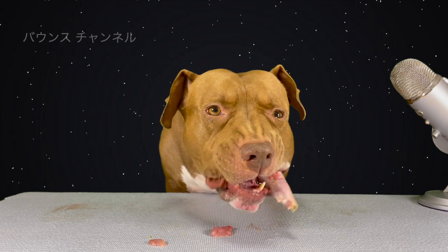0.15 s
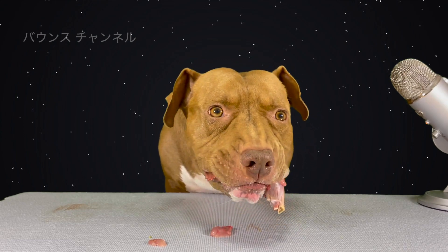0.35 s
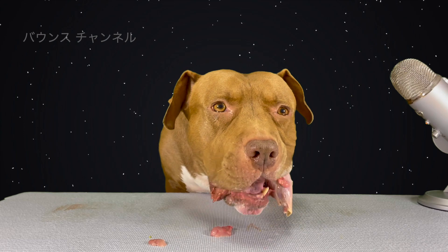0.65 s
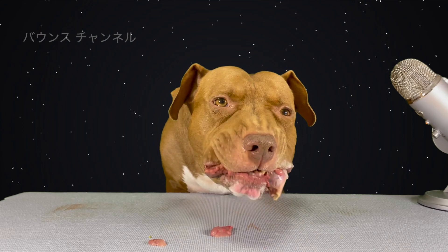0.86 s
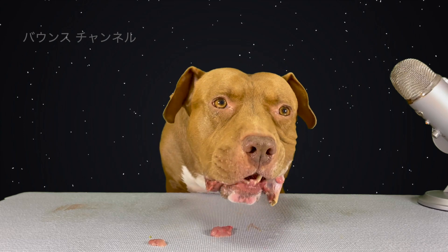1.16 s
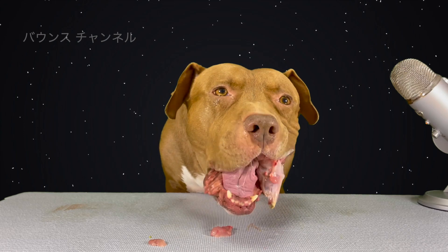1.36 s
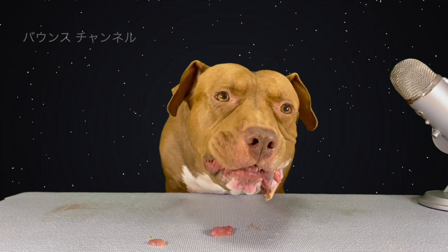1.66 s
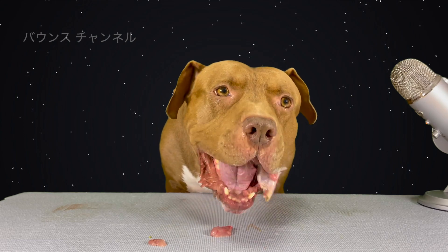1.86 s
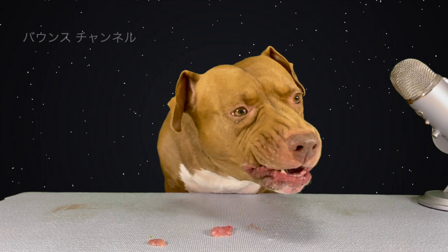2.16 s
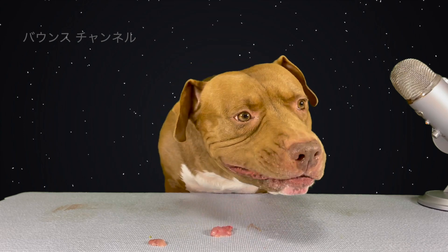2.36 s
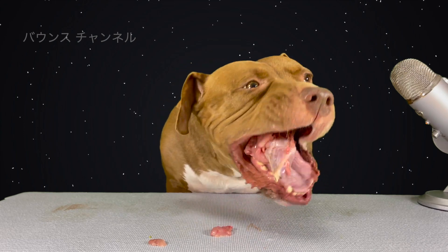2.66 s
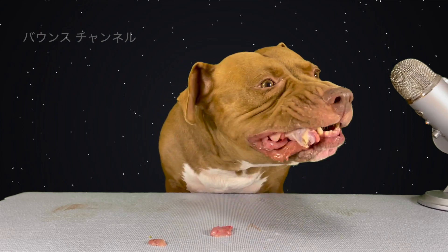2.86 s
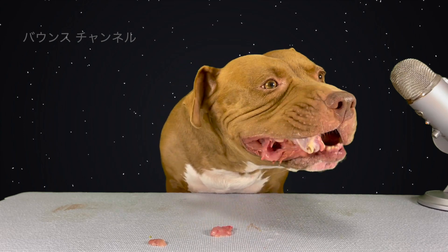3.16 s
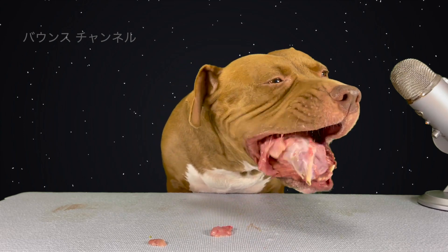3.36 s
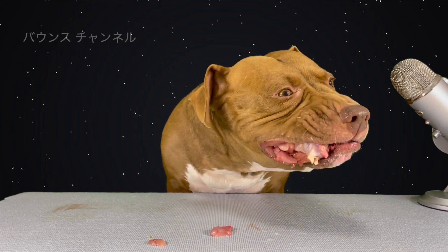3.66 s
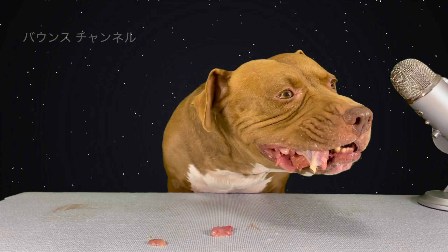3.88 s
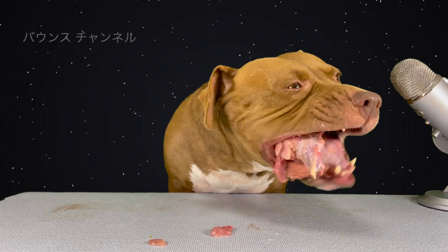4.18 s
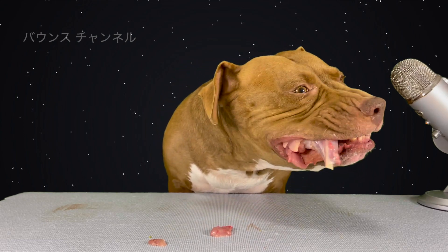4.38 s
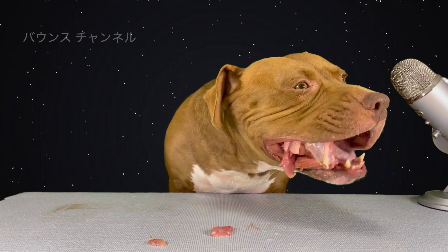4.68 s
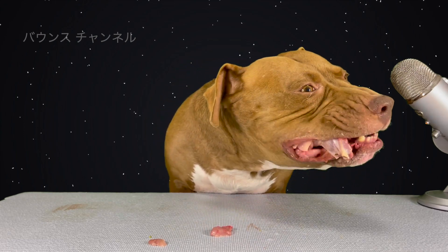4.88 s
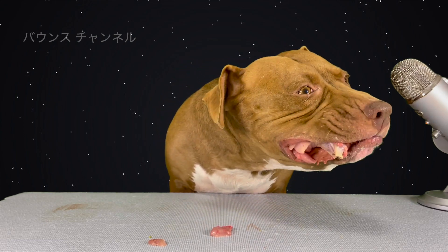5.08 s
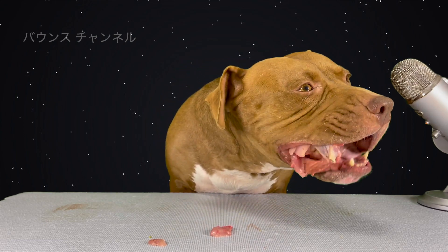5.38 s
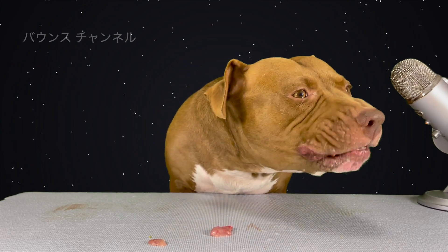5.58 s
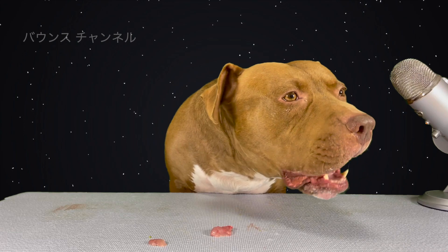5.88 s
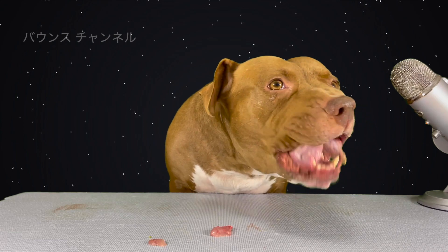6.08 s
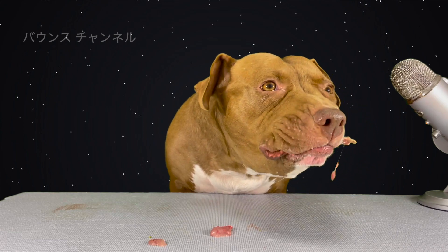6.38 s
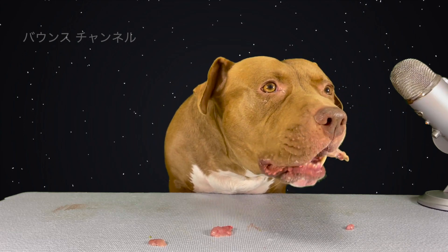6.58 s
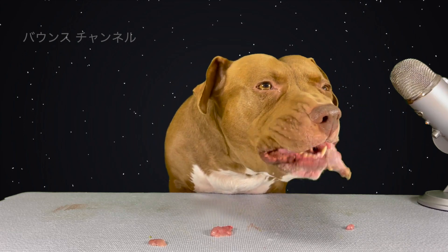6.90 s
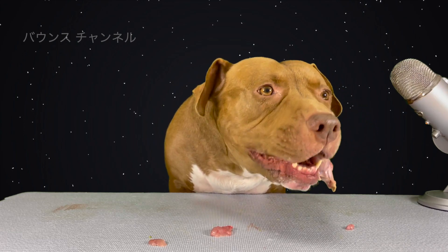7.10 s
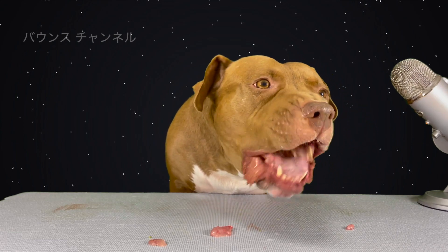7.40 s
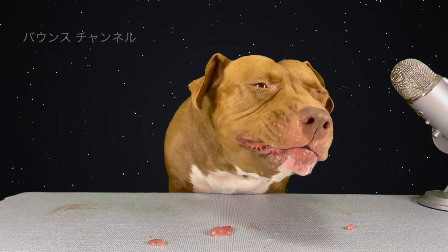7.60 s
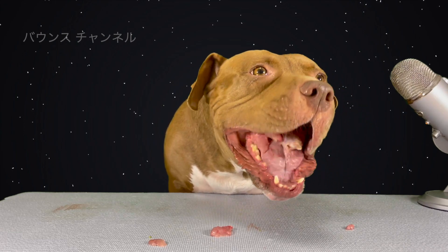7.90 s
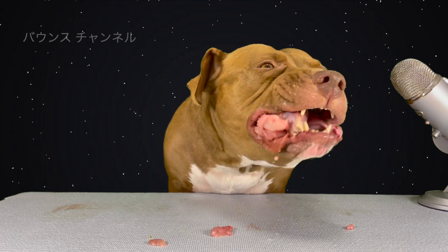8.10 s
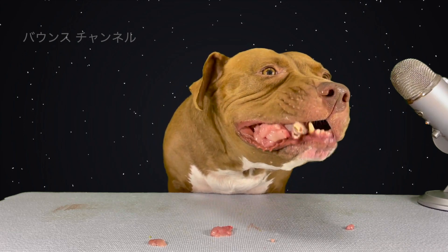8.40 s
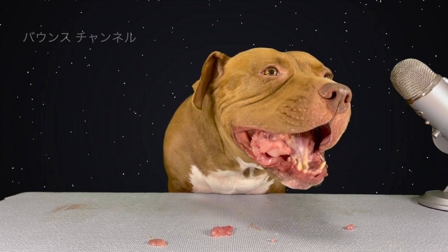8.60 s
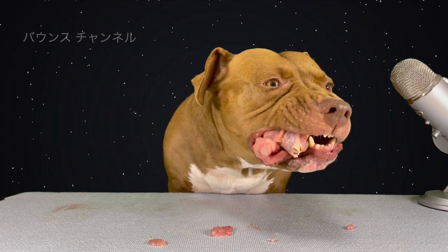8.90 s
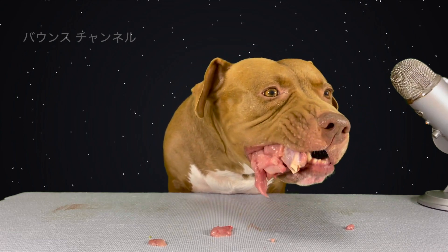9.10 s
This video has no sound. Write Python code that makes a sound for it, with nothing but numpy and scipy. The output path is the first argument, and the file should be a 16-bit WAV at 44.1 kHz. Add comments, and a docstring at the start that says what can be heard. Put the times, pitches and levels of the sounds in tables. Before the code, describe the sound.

Close mono pickup of wet canine chewing in a small reflective room. Irregular low-pitched lip pops lead, followed by quiet squishing and a lull, then hard bone snaps with crackling gristle and brief slurps. Clusters of crunches and hollow smacks peak past the middle, ease off, and return in bursts near eight and nine seconds. Fizzing saliva, faint gurgles, soft hiss and low rumble fill the gaps.

```python
"""A dog chews raw meat and bone: mouth air pockets pop, bone cracks and saliva ticks, each a decaying ring
with a snap of noise. Between these come sucking, crackling crushes, squelch and fizz, in which
random slips and bubbles excite resonances of mouth, flesh and froth. A small, hard-walled room adds
decaying echoes; behind lie a faint hiss, a low rumble and gurgles. A single microphone feeds both channels."""
import sys
import numpy as np
from scipy import signal
from scipy.fft import rfft, irfft
from scipy.io import wavfile
from scipy.ndimage import uniform_filter1d

SR = 44100
rng = np.random.default_rng(int(sys.argv[2]) if len(sys.argv) > 2 else 0)


def store_wav(level_fs):
    """Save 16-bit WAV to argv[1]."""
    pcm = np.round(np.clip(np.atleast_2d(level_fs), -1, 1) * 32767)
    wavfile.write(sys.argv[1], SR, pcm.T.astype(np.int16))


N = 407925  # samples

# Air pockets bursting in the mouth: t/s of the peak, ring peak level/dB, cavity f/Hz
POPS = [(0.273, -17.5, 780), (0.2805, -4.5, 713), (0.4485, -19.5, 780), (0.535, -13, 950),
        (0.5415, -10.5, 725), (0.8973, -11.5, 604), (0.9147, -11, 630), (0.9469, -11.5, 1350),
        (1.145, -26.5, 790), (1.2899, -23.5, 1180), (1.5277, -22, 1370), (1.6155, -21, 925),
        (1.844, -17, 906), (1.9537, -21, 900), (2.1007, -19, 527), (2.261, -18, 600), (3.1106, -8.5, 1116),
        (3.458, -23, 573), (3.49, -18.5, 900), (4.21, -24, 210), (4.2661, -18.5, 1300), (4.366, -24, 1170),
        (5.7428, -14, 563), (5.757, -13, 453), (6.0844, -8.5, 567), (6.1977, -6.5, 1450),
        (6.2298, -11, 1270), (6.3451, -6, 1130), (6.8868, -14, 454), (6.9849, -10.5, 1490),
        (7.0262, -15, 490), (7.4374, -17.5, 407), (7.5918, -10.5, 410), (7.674, -23, 650),
        (8.402, -18.5, 655), (8.9934, -18.5, 296), (9.0752, -24, 614)]
# Bone and gristle breaking: t/s of the peak, ring peak level/dB, ring f/Hz
CRACKS = [(0.7697, -19.5, 4820), (0.8961, -12, 1370), (0.914, -12, 2460), (1.131, -29, 1560),
          (1.196, -25, 3230), (1.289, -21.5, 3580), (1.319, -33, 5340), (1.5272, -23.5, 2370),
          (1.61, -19.5, 4040), (1.7066, -24, 3670), (1.725, -16.5, 3580), (1.753, -16, 3930),
          (2.1247, -14.5, 1560), (2.6298, -15, 4850), (2.7949, -8, 2000), (3.0995, -17, 2880),
          (3.1551, -18, 2080), (3.249, -8, 2400), (3.3754, -20, 2670), (3.386, -25, 2440),
          (3.469, -18.5, 1570), (3.5669, -18.5, 1970), (3.6779, -6.5, 2510), (4.2036, -9, 3650),
          (4.417, -35, 3700), (4.5537, -24.5, 1670), (4.8389, -18.5, 2380), (4.9018, -1, 2920),
          (4.9655, -14, 1700), (5.0015, -8.5, 1660), (5.08, -23, 2820), (5.0887, -8, 2820),
          (5.4356, -4.5, 2570), (5.4552, -9, 3050), (5.5305, -19, 2700), (5.7949, -18.5, 1740),
          (5.8494, -19.5, 3420), (5.918, -25, 2300), (5.9311, -2.5, 2300), (6.0276, -20, 1980),
          (6.041, -14.5, 1910), (6.0682, -9, 2760), (6.0776, -7.5, 1680), (6.1034, -14, 2740),
          (6.1516, -13, 1640), (6.3058, -6, 2120), (6.4559, -15.5, 2370), (6.6306, -18.5, 2660),
          (6.6634, -16.5, 2070), (6.8857, -5.5, 1680), (6.9709, -8.5, 1520), (7.2249, -28, 2040),
          (7.3918, -18, 2000), (7.4307, -12.5, 1980), (7.626, -25.5, 2660), (7.947, -25.5, 2250),
          (8.038, -21.5, 2050), (8.1168, -17.5, 4100), (8.1356, -10.5, 2180), (8.147, -5, 1880),
          (8.393, -30, 2960), (8.546, -28, 2270), (8.8598, -2.5, 2340), (9.1995, -22.5, 4250),
          (9.2213, -21, 3620)]
# Strands of saliva snapping: t/s of the peak, ring peak level/dB, centre f/Hz
TICKS = [(0.46, -29, 2150), (0.7147, -21.5, 8460), (0.8136, -22, 7780), (1.454, -21.5, 6260),
         (1.4802, -19, 6900), (1.628, -16.5, 5750), (1.726, -18.5, 7910), (2.2297, -24.5, 10650),
         (3.3752, -21.5, 6770), (3.6783, -10, 10880), (4.192, -18.5, 2200), (4.2677, -13.5, 6860),
         (4.9797, -9.5, 10530), (5.887, -27, 11800), (6.0683, -12, 9000), (6.1328, -16.5, 7700),
         (6.272, -25, 8200), (6.3037, -14.5, 6500), (6.345, -11.5, 8510), (6.431, -34, 7200),
         (6.4574, -20, 7270), (6.8378, -22.5, 9430), (6.9002, -18, 9680), (8.365, -30, 7260),
         (8.3769, -23.5, 7100)]
# Drawn-out sucking through a narrow pocket: start t/s, length t/s, level/dB before fading, first f/Hz, last f/Hz
SUCKS = [(0.0, 0.01, -19.5, 1870, 1620), (0.056, 0.061, -41, 1880, 1690), (0.788, 0.12, -36, 252, 170),
         (2.808, 0.081, -34, 240, 163), (3.091, 0.11, -25.5, 1040, 1260), (3.615, 0.092, -28.5, 1110, 1040),
         (3.915, 0.13, -37, 1310, 1370), (4.262, 0.1, -37, 1320, 1340), (4.89, 0.097, -26.5, 1680, 1630),
         (4.893, 0.086, -24, 3030, 2900), (5.009, 0.065, -21, 1350, 1310), (5.406, 0.039, -24, 1040, 1050),
         (5.44, 0.081, -25, 2670, 2470), (5.924, 0.04, -21.5, 1230, 1200), (6.18, 0.24, -29, 1350, 1160),
         (6.451, 0.058, -30, 1000, 1010), (6.845, 0.07, -33, 280, 292), (6.962, 0.1, -23, 1390, 1350),
         (7.113, 0.087, -40, 330, 260), (8.128, 0.09, -23.5, 1940, 1640), (8.125, 0.06, -20, 6100, 4800),
         (8.19, 0.17, -28, 1060, 1270), (8.393, 0.057, -26, 1430, 1360), (8.843, 0.055, -22, 3780, 3640),
         (8.854, 0.048, -30, 2040, 1850), (8.948, 0.066, -31.5, 220, 190)]
# Teeth grinding through tissue: start t/s, length t/s, level/dB before shaping, centre f/Hz
CRUSHES = [(0, 0.046, -31, 1940), (0.105, 0.15, -31, 940), (0.164, 0.048, -34.5, 3040),
           (0.62, 0.24, -41.5, 5800), (0.882, 0.049, -25.5, 3600), (1.183, 0.076, -42.5, 4650),
           (1.388, 0.19, -40, 5940), (1.838, 0.055, -37, 3820), (2.038, 0.11, -32, 5360),
           (2.215, 0.02, -34, 4800), (2.689, 0.07, -33, 7300), (2.698, 0.33, -40, 1870),
           (3.252, 0.069, -39.5, 3260), (3.362, 0.16, -38.5, 4240), (3.55, 0.078, -34, 6900),
           (3.611, 0.06, -23.5, 7800), (4.748, 0.079, -33.5, 5370), (4.884, 0.031, -22.5, 3430),
           (4.905, 0.091, -26, 2270), (4.983, 0.088, -23.5, 3800), (5.495, 0.04, -32, 480),
           (5.238, 0.043, -39.5, 5420), (5.4, 0.18, -33.5, 2830), (6.007, 0.076, -36.5, 10200),
           (6.062, 0.22, -31.5, 4900), (6.325, 0.016, -22.5, 1980), (6.45, 0.015, -23.5, 6850),
           (6.599, 0.17, -38.5, 6760), (6.808, 0.26, -31.5, 2850), (7.213, 0.052, -32, 3450),
           (7.351, 0.21, -37, 1980), (8.001, 0.076, -36.5, 7300), (8.109, 0.16, -30.5, 3870),
           (8.396, 0.051, -40, 1800), (8.776, 0.012, -31.5, 3600), (9.215, 0.021, -36.5, 3400)]
# Bubble loudness by pitch: f/Hz, relative level/dB
FIZZ_SPECTRUM = [(2500, 8), (4000, 0), (7000, 12), (11000, 11), (15000, 2)]
# Reverberation time of the room: f/Hz, t60 t/s
ROOM_T60 = [(400, 0.37), (6000, 0.31)]
# Low rumble over time: t/s, level/dB
RUMBLE = [(0.0, -51), (4.53, -52), (6.36, -49), (8.22, -43.5), (9.25, -55)]
# Spectrum of the steady hiss: f/Hz, relative level/dB
HISS_SPECTRUM = [(40, -6), (300, 0), (2000, -6), (15500, -12)]

RING_SAMPLES = 1200  # length of one short ring
SNAP_NARROWING = .3  # dB of snap width lost per dB of weakness: small snaps keep their colour
MIN_SUCK_WIDTH_HZ = 160  # low pockets are flabby: no sucking ring is narrower than this
REDRAW_SAMPLES = 1200  # each random pitch in a crush is held this long before the next is drawn
WANDER = .025  # rms share by which wet pockets waver in pitch
PATCHY_DB = 3.5  # rms depth of the colour patches
REST_DB, LINGER_S = -47.5, 0.018  # grinding effort with the teeth apart; how long the saliva stays stirred
SQUELCH_REST_DB, SQUELCH_FOLLOWS = -49, 0.83  # level at rest; dB per dB of effort
MOUTH_REST_HZ, MOUTH_HZ_PER_DB = 910, 11  # the mouth rings higher as the jaw works harder
FIZZ_REST_DB, FIZZ_FOLLOWS = -47.5, .5  # level at rest; dB per dB of effort
BUBBLES_PER_S, BUBBLES_PER_S_PER_DB = 10.5, 1  # at each pitch: rate at rest; gain with effort
WALL_S = .0125  # delay of the first wall echo
WET_DB, NEAR_DB = -5, -5  # echoes against the direct sound; near taps against late wall taps
HISS_DB, GURGLE_DB = -58, -53.5
BAND_EDGE_HZ = 15800


def gain_of(db):
    """Logarithmic level: converts decibels to an amplitude factor."""
    return 10 ** (np.asarray(db) / 20)


def evened(x):
    """Normalization: scales a signal to rms 1."""
    return x / np.sqrt(np.mean(x ** 2) + 1e-20)


def read(points, hz):
    """Interpolation: reads a spectrum table on a logarithmic frequency axis."""
    f, value = np.transpose(points)
    return np.interp(np.log(hz + 1), np.log(f + 1), value)


def resonate(x, hz, width):
    """Resonance by heterodyning: shift hz to zero, smooth, shift back; the gain at hz is 1."""
    turn = np.exp(2j * np.pi * np.cumsum(hz * np.ones(len(x))) / SR)
    r = np.exp(-np.pi * width / SR)
    smooth = signal.lfilter([1 - r], [1, -r], x / turn + 1e-18)
    return 2 * (turn * smooth).real


def sparse(per_s, spread_db):
    """Random impulse process: clicks at chance moments, most small and a few large."""
    size = gain_of(spread_db * np.minimum(rng.exponential(1, N), 4))
    sign = rng.choice([-1., 1.], N)
    return size * sign * (rng.random(N) < per_s / SR)


def grain(hz, cycles, glide, rise_s):
    """Damped oscillation: swells for rise_s, glides in pitch and falls by 1/e per given cycles; peak 1."""
    t = np.arange(RING_SAMPLES) / SR
    swell = np.sin(np.pi / 2 * np.minimum(t / rise_s, 1)) ** 2
    cycles_after = np.maximum(t - rise_s, 0) * hz
    wave = np.sin(2 * np.pi * hz * t * (1 + glide * hz * t))
    shape = swell * np.exp(-cycles_after / cycles) * wave
    return shape / abs(shape).max()


def bursts(rows, cycles, glide, rise_s, upper, snap_db, snap_s, snap_width):
    """Impulsive excitation: each event is a ring, a share of its upper mode and a broader noise snap."""
    out = np.zeros(N + RING_SAMPLES)
    t = np.arange(RING_SAMPLES) / SR
    noises = rng.standard_normal((len(rows), RING_SAMPLES))
    for (s, db, hz), noise in zip(rows, noises):
        ring = grain(hz, cycles, glide, rise_s)
        ring = ring + upper * grain(1.897 * hz, 2 * cycles, glide / 2, rise_s)
        width = snap_width * hz * gain_of(db * SNAP_NARROWING)
        snap = evened(resonate(resonate(noise, hz, width), hz, width))
        snap_envelope = np.exp(-abs(t - rise_s) / snap_s) * np.minimum(t / rise_s, 1)
        snap *= gain_of(snap_db) * snap_envelope
        start = round((s - rise_s) * SR)  # so that the swell ends at s
        out[start:][:RING_SAMPLES] += gain_of(db) * (ring + snap)
    return out[:N]


def pops():
    """Cavity resonance: a bursting air pocket gives a heavily damped ring of falling pitch."""
    return bursts(POPS, cycles=0.75, glide=-0.0024, rise_s=0.002973, upper=0,
                  snap_db=-9.0, snap_s=0.0066, snap_width=1.98)


def cracks():
    """Brittle fracture: breaking bone rings in two modes with a short snap."""
    return bursts(CRACKS, cycles=1.9, glide=-.004, rise_s=.0011, upper=.35,
                  snap_db=-7, snap_s=.0015, snap_width=1.1)


def ticks():
    """Release of tension: a snapping saliva strand gives a brief, slightly rising ring and strong snap."""
    return bursts(TICKS, cycles=6, glide=.0004, rise_s=.0016, upper=0,
                  snap_db=-3, snap_s=.0025, snap_width=.9)


def wavering():
    """Modulation of resonance: a pitch factor drifts about 1 within some 15 ms, as wet walls shift."""
    drift = uniform_filter1d(uniform_filter1d(rng.standard_normal(N), size=600), size=600)
    return np.exp(WANDER * evened(drift))


def sucks():
    """Stick-slip excitation: uneven slips ring a narrow, gliding pocket, fading as the seal loosens."""
    out = np.zeros(N)
    slips = evened(sparse(per_s=1200, spread_db=3.5))
    waver = wavering()
    for s, length, db, first_hz, last_hz in SUCKS:
        at = slice(round(s * SR), round((s + length) * SR))
        hz = np.linspace(first_hz, last_hz, len(out[at])) * waver[at]
        ring = resonate(slips[at], hz, max(.1 * hz[0], MIN_SUCK_WIDTH_HZ))
        ring = evened(resonate(ring, hz, max(.22 * hz[0], MIN_SUCK_WIDTH_HZ)))
        fade = signal.windows.tukey(len(hz), .25) * np.linspace(1, .5, len(hz))
        out[at] += gain_of(db) * ring * fade
    return out


def crushes():
    """Clustered fracture: fibres tear in a broad crackle, with three narrow layers at random held pitches."""
    clumps = uniform_filter1d(rng.standard_normal((4, N)), size=400, axis=1)
    clumps = gain_of(4 * evened(clumps))
    tears = clumps[0] * (evened(sparse(per_s=600, spread_db=3.5)) + .7 * rng.standard_normal(N))
    layers = [clump * (evened(sparse(per_s=150, spread_db=3.0)) + .5 * rng.standard_normal(N))
              for clump in clumps[1:]]
    octaves = rng.uniform(-1, .6, (N // REDRAW_SAMPLES + 1, 3))  # layer pitch against the centre
    octaves = np.repeat(octaves, REDRAW_SAMPLES, axis=0)[:N].T
    pitches = wavering() ** 2 * 2 ** octaves
    out = np.zeros(N)
    for s, length, db, hz in CRUSHES:
        at = slice(round(s * SR), round((s + length) * SR))
        hump = evened(resonate(resonate(tears[at], hz, 3 * hz), hz, 2.5 * hz))
        narrow = sum(resonate(resonate(clicks[at], hz * pitch[at], .14 * hz), hz * pitch[at], .3 * hz)
                     for clicks, pitch in zip(layers, pitches))
        crackle = evened(hump + 1.5 * evened(narrow))
        out[at] += gain_of(db) * crackle * signal.windows.tukey(len(hump), .4)
    return signal.sosfilt(signal.butter(2, 350, "high", fs=SR, output="sos"), out)


def effort():
    """Addition of power with relaxation: grinding effort in dB above rest, lingering after each crush."""
    power = np.zeros(N)
    for s, length, db, _ in CRUSHES:
        power[round(s * SR):round((s + length) * SR)] += gain_of(2 * (db - REST_DB))
    r = np.exp(-1 / (LINGER_S * SR))
    return 10 * np.log10(1 + signal.lfilter([1 - r], [1, -r], power))


def squelch(grind_db):
    """Coupled resonance: wet slips ring the mouth, its pitch following the effort; others ring the flesh."""
    mouth_hz = MOUTH_REST_HZ + MOUTH_HZ_PER_DB * grind_db
    slips = [evened(sparse(per_s=200, spread_db=3.5)) + .6 * rng.standard_normal(N) for _ in range(2)]
    cavity = evened(resonate(resonate(slips[0], mouth_hz, 1160), mouth_hz, 4200))
    flesh = evened(resonate(resonate(slips[1], 377, 217), 830, 1630))
    return gain_of(SQUELCH_REST_DB + SQUELCH_FOLLOWS * grind_db) * evened(cavity + 0.44 * flesh)


def fizz(grind_db):
    """Bubble resonance: many sizes burst in saliva over finer froth; grinding makes them many and loud."""
    per_s = BUBBLES_PER_S + BUBBLES_PER_S_PER_DB * grind_db
    total = np.zeros(N)
    for hz in np.geomspace(2600, 14500, num=9):
        froth = 0.5 * rng.standard_normal(N)
        clicks = evened(sparse(per_s, spread_db=4.2)) + froth
        bubbles = signal.oaconvolve(clicks, grain(hz, cycles=2.5, glide=0.003, rise_s=0.0006))[:N]
        total += gain_of(read(FIZZ_SPECTRUM, hz)) * evened(bubbles)
    return gain_of(FIZZ_REST_DB + FIZZ_FOLLOWS * grind_db) * evened(total)


def patchy(x):
    """Time-varying filtering: shifting wet flesh colours sound in patches about 1 kHz wide, 30 ms long."""
    z = signal.stft(x, nperseg=256, noverlap=192)[2]
    patches = uniform_filter1d(rng.standard_normal(z.shape), size=6, axis=0)
    patches = evened(uniform_filter1d(patches, size=20, axis=1))
    gain = gain_of(PATCHY_DB * (patches - 1 / 2))
    return signal.istft(z * gain, nperseg=256, noverlap=192)[1][:N]


def room(x):
    """Reverberation: weak near echoes, then walls, each band with its own decay; three tails take turns."""
    wet = np.zeros(N)
    phase = np.arange(N) / SR * 2.3
    for k in range(3):
        taps = np.zeros(SR // 2)
        at = np.arange(120, SR // 2 - 40, 40)
        walls = 1 + 1.2 * np.exp(-(at / SR - WALL_S) / .004)  # strongest at the first wall
        size = np.where(at < WALL_S * SR, gain_of(NEAR_DB), walls)
        taps[at + rng.integers(0, 40, len(at))] = size * rng.choice([-1., 1.], len(at))
        hz, t, z = signal.stft(taps, SR, nperseg=128)
        decay = gain_of(-60 * t / read(ROOM_T60, hz)[:, None])
        tail = signal.istft(z * decay, SR, nperseg=128)[1]
        share = np.sqrt(2 / 3) * np.cos(np.pi * (phase + k / 3))  # squares of the three sum to 1
        wet += signal.oaconvolve(x * share, tail / np.linalg.norm(tail))[:N]
    return wet


def background():
    """Filtered noise: steady hiss, a wavering low rumble and lumpy gurgles from the throat."""
    hz = np.fft.rfftfreq(N, 1 / SR)
    hiss = irfft(rfft(rng.standard_normal(N)) * gain_of(read(HISS_SPECTRUM, hz)), N)
    rumble = resonate(resonate(rng.standard_normal(N), 92.0, 18.6), 78, 75)
    rumble_s, rumble_level = np.transpose(RUMBLE)
    rumble_db = np.interp(np.arange(N) / SR, rumble_s, rumble_level)
    gurgle = resonate(resonate(sparse(per_s=170, spread_db=4.0), 221, 79), 132, 180)
    steady = gain_of(HISS_DB) * evened(hiss) + gain_of(rumble_db) * evened(rumble)
    return steady + gain_of(GURGLE_DB) * evened(gurgle)


def scene():
    """Superposition: the mouth, its echo in the room and the background, alike in both channels."""
    grind_db = effort()
    wet_tissue = crushes() + squelch(grind_db) + fizz(grind_db)
    mouth = pops() + cracks() + ticks() + sucks() + patchy(wet_tissue)
    mono = mouth + gain_of(WET_DB) * room(mouth) + background()
    return np.array([mono, mono])


def record(dry):
    """Transduction: the microphone thins bass and dulls treble; peaks saturate softly, then a band limit."""
    thin = signal.sosfilt(signal.butter(3, 58, "high", fs=SR, output="sos"), dry)
    dull = signal.sosfilt(signal.butter(1, 13000, fs=SR, output="sos"), thin)
    soft = 0.91 * np.tanh(dull / 0.89)
    band_limit = signal.firwin(511, BAND_EDGE_HZ, window=("kaiser", 9), fs=SR)
    return signal.oaconvolve(soft, band_limit[None], "same")


dry = scene()
out = record(dry)
store_wav(out)
```